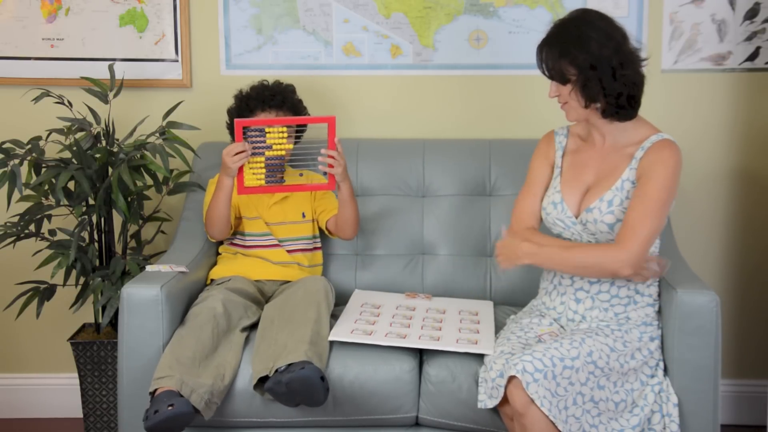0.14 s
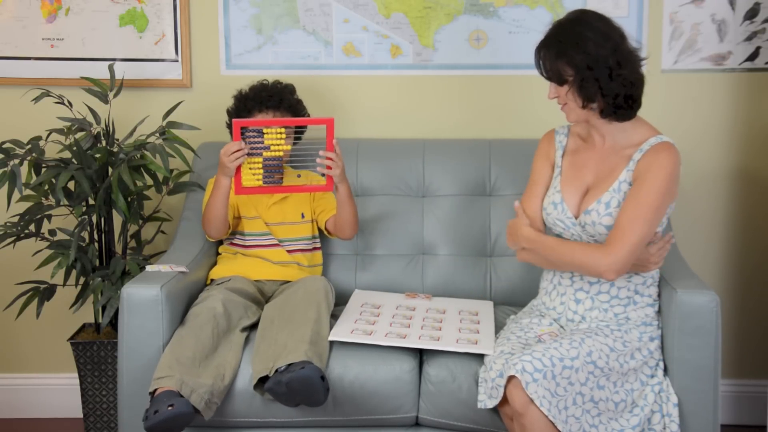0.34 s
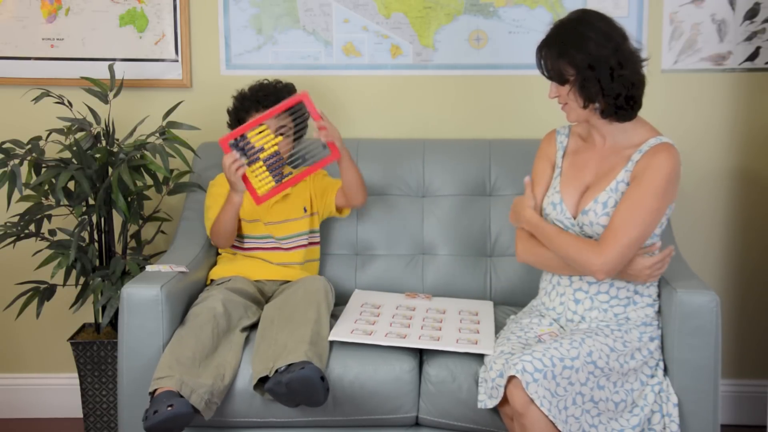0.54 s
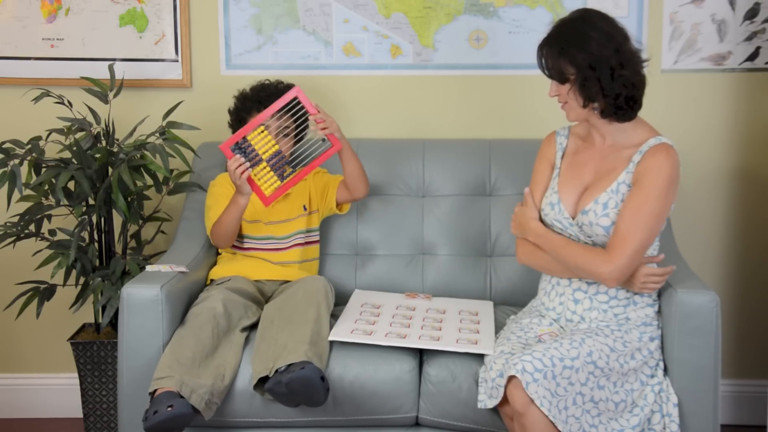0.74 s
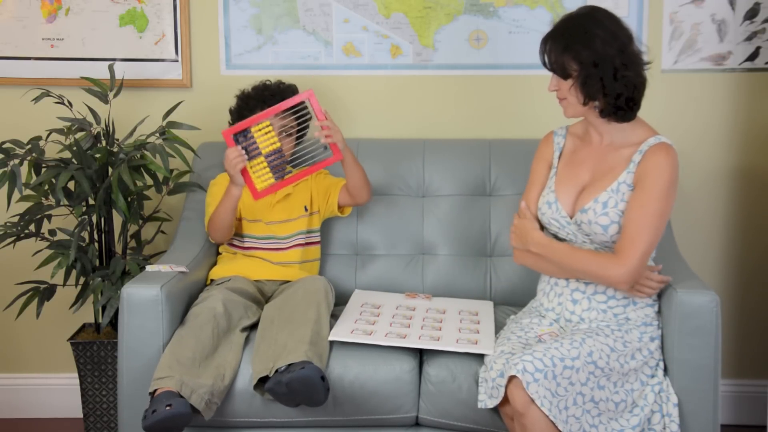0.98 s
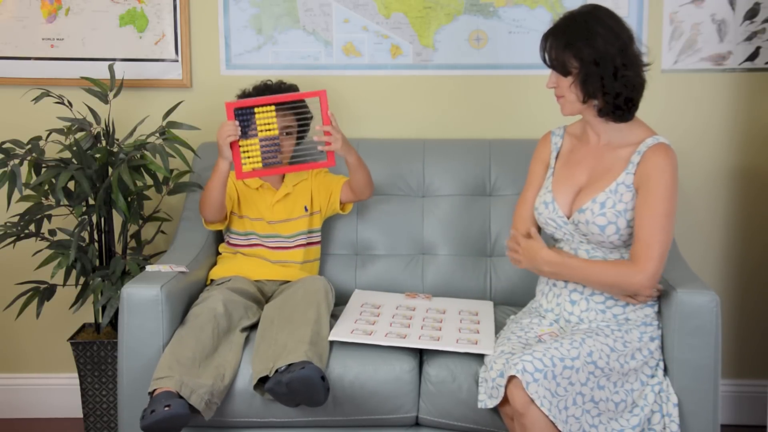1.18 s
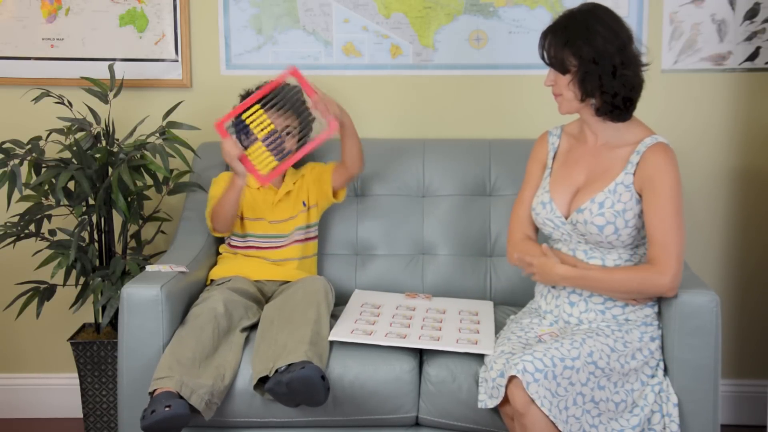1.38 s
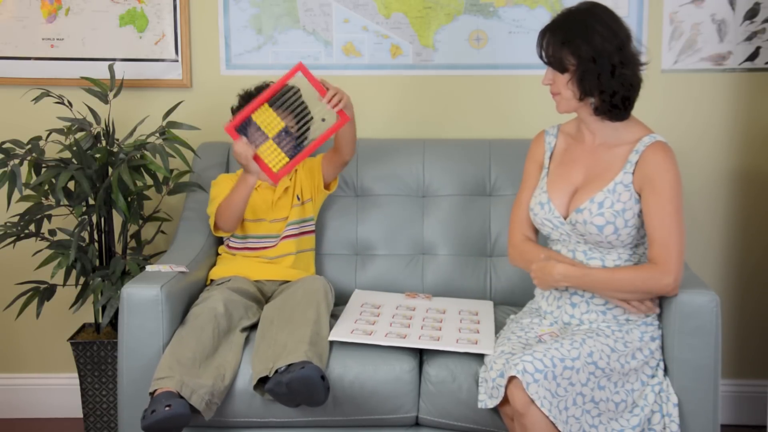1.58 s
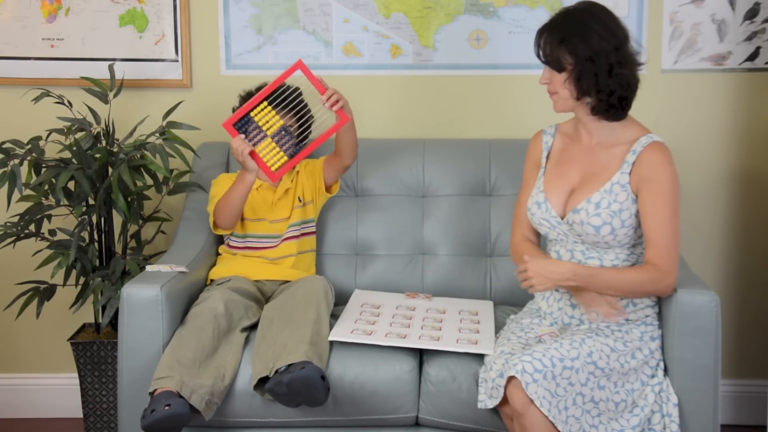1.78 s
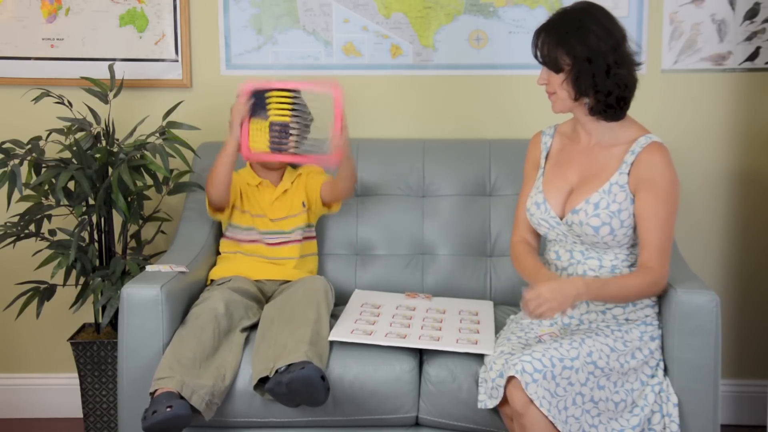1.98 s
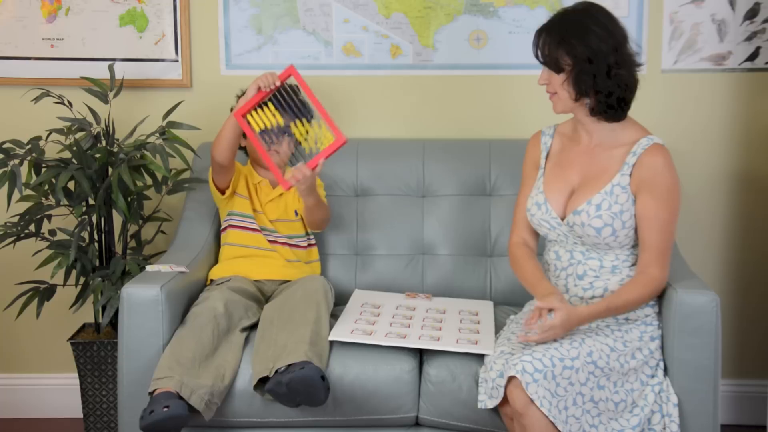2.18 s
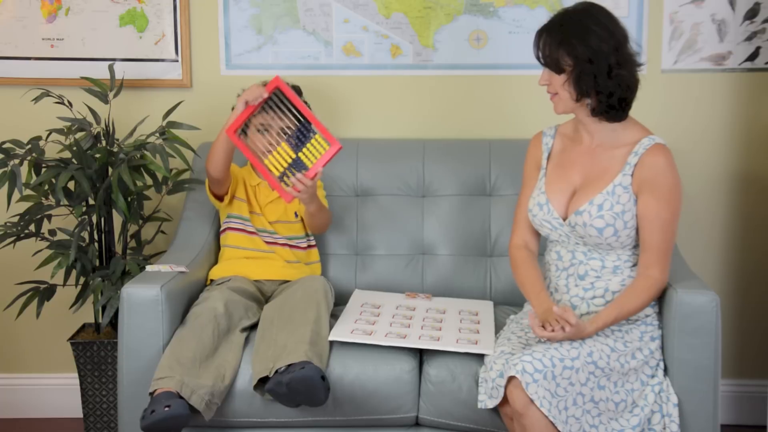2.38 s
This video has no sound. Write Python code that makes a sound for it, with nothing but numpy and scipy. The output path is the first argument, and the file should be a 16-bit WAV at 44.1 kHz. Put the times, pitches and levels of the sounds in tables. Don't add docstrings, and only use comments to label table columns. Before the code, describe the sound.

A small plastic abacus is tilted by hand: short bright bead rattles, sparse faint clicks, then all the beads pile over loudly. Short room tail, low hum and hiss, stereo microphone a couple of metres off.

```python
import sys
import numpy as np
from scipy import signal
from scipy.fft import rfft, irfft
from scipy.io import wavfile
from scipy.ndimage import uniform_filter1d

SR = 44100
rng = np.random.default_rng(int(sys.argv[2]) if len(sys.argv) > 2 else 0)


def invert_db(level):
    return 10 ** (np.asarray(level, dtype=float) / 20)


def put_to_file(sound):
    columns = np.atleast_2d(sound).T
    safe = np.clip(columns, -1, 1)
    whole_steps = np.round(safe * 32767)
    wavfile.write(sys.argv[1], SR, whole_steps.astype(np.int16))


N = 107295

# freq_hz, density_db_per_hz
AIR_MID = [(25, -23), (45, 0), (90, -2), (300, -1.5), (900, -5), (2500, -8), (8000, -10.5), (15800, -13.5)]
# freq_hz, density_db_per_hz
AIR_DIFFERENCE = [(15, -40), (25, -15), (179, -4), (211, -6), (352, -7), (557, -7.5), (881, -9.5),
                  (4950, -13.5), (15800, -17)]
# freq_hz, level_db_rms
STEADY_TONES = [(59.9, -58.5), (119.8, -65), (179.7, -74), (239.7, -70), (300, -68.5), (900, -66),
                (2573, -63), (15690, -70)]
# start_s, peak_db, pitch_hz, t60_s
GRIP_KNOCKS = [
    (0.584, -48, 606, 0.062),
    (.645, -40.5, 512, 0.063),
    (0.645, -53, 930, 0.027),
]
# start_s, length_s, level_db, rise_share_0_1, frame_re_bead_db
PILE_UPS = [(.398, 0.014, -45, 0.1, -14), (0.551, 0.039, -38, .9, 3), (.572, 0.044, -31, 0.53, -1.5),
            (0.619, .035, -36, 0, 1), (0.686, 0.019, -26, 0, -7), (0.709, 0.047, -40.5, 0, -5.5),
            (0.788, 0.037, -42.5, 0.7, -11), (1.03, 0.036, -51, 0.5, 6), (1.22, 0.026, -51.5, .2, -13),
            (1.285, 0.048, -50, 0.15, 2), (1.396, 0.033, -39.5, 0.43, 8.5), (1.428, 0.051, -37, 0.47, 4.5),
            (1.567, .02, -40.5, 0.53, 7), (1.651, 0.031, -43, 0.16, 3.5), (1.8289, .011, -34, 0.57, -17),
            (1.84, 0.028, -41.5, 0, -9), (1.959, .03, -43, 0.07, 7), (2.019, 0.038, -36.5, 0.97, 6),
            (2.043, 0.069, -35, .1, 2.5), (2.1826, 0.036, -18.5, 0, -4), (2.223, 0.054, -20, .2, -7.5),
            (2.27, 0.036, -18.5, 0.02, -3.5), (2.321, 0.041, -18, 0, -5), (2.377, 0.021, -20.5, 0, -6)]
# freq_hz, level_db
BEAD_COLOUR = [(1300, -25), (2000, -17), (2700, -3), (4100, -5), (5500, -2.5), (8000, -2), (10500, -6.5),
               (12500, -14.5)]
# pitch_hz, level_db, t60_s
ROD_MODES = [(2620, -6, .025), (3080, -4, .025), (3540, -1, .03), (3750, 0, .025), (4060, 1, .02),
             (4390, 0, .03), (4750, -3, .025)]
# pitch_hz, level_db, t60_s
FRAME_MODES = [(593, -11, 0.021), (860, -12, 0.011), (945, -9, 0.029), (1170, -4.5, 0.0083),
               (1470, -11.5, .02), (1570, -9.5, 0.025), (2040, -8.5, 0.016), (2250, -7, 0.031)]
# low_hz, high_hz, loudness_limit_db
LOST_BANDS = [(12600, 13400, -24), (13400, 14200, -28), (14200, 15000, -31), (15000, 22050, -30)]

AIR_MID_DB, AIR_DIFFERENCE_DB, TONE_WANDER_DB = -50.5, -54.5, 0.5
ROOM_DB, ROOM_T60_S, TREBLE_T60_S, TREBLE_HZ = -1, 0.71, 0.67, 6100
EARLY_DB, EARLY_T60_S, FIRST_ECHO_S, ROOM_ALIKE_SHARE = 2, 0.08, 0.003, 0.69
PAN_DB, RIGHT_LAG_S = 1, 3.5e-5
CLACKS_PER_S, CLACK_SPREAD_DB, RELEASE_S = 4000, 1.5, 0.0023
BEAD_T60_CYCLES, RODS_DB, FRAME_DB = 11.0, -3, -10.5
DULLING_DB_PER_OCTAVE_PER_DB, USUAL_FRAME_DB = 0.24, -4
SWING_UP_CYCLES = 56
BLOCK_SAMPLES, LIMIT_SPREAD_DB, SETTLE_BLOCKS, SETTLED_DB = 1024, 6, 7, 12


def at_hz(points, hz):
    point_hz, point_db = np.array(points).T
    return np.interp(np.log(hz), np.log(point_hz), point_db)


def rms_one(x):
    return x / np.sqrt(np.mean(x ** 2) + 1e-20)


def ring(clicks, hz, t60_s):
    radius = invert_db(-60 / (t60_s * SR))
    angle = 2 * np.pi * hz / SR
    return signal.lfilter([0, np.sin(angle)], [1, -2 * radius * np.cos(angle), radius ** 2], clicks + 1e-18)


def filtered(x, order, cutoff_hz, kind="low"):
    return signal.sosfilt(signal.butter(order, cutoff_hz, kind, fs=SR, output="sos"), x)


def coloured(spectrum):
    hz = np.maximum(np.arange(N // 2 + 1) * SR / N, 1)
    return rms_one(irfft(rfft(rng.standard_normal(N)) * invert_db(at_hz(spectrum, hz)), N))


def air():
    mid = invert_db(AIR_MID_DB) * coloured(AIR_MID)
    difference = invert_db(AIR_DIFFERENCE_DB) * coloured(AIR_DIFFERENCE)
    return mid + difference * [[1], [-1]]


def tones():
    t, out = np.arange(N) / SR, np.zeros(N)
    for hz, level_db in STEADY_TONES:
        wander = np.interp(t, np.linspace(0, N / SR, 40), rng.standard_normal(40))
        level = np.sqrt(2) * invert_db(level_db + TONE_WANDER_DB * wander)
        out += level * np.sin(2 * np.pi * (hz * t + rng.random()))
    return out


def room(x):
    t = np.arange(SR // 2) / SR
    mid, side = rng.standard_normal((2, len(t)))
    side = filtered(side, 1, 2500, "high")
    echoes = np.sqrt(ROOM_ALIKE_SHARE) * mid + np.sqrt(1 - ROOM_ALIKE_SHARE) * side * [[1], [-1]]
    low = filtered(echoes, 2, TREBLE_HZ)
    tail = low * invert_db(-60 * t / ROOM_T60_S) + (echoes - low) * invert_db(-60 * t / TREBLE_T60_S)
    tail *= np.clip(t / FIRST_ECHO_S - 1, 0, 1)
    tail *= 1 + invert_db(EARLY_DB - 60 * t / EARLY_T60_S)
    tail /= np.sqrt(np.sum(tail ** 2) / 2)
    return signal.fftconvolve(x[None], tail, axes=1)[:, :N]


def knocks():
    out = np.zeros(N)
    for start_s, peak_db, hz, t60_s in GRIP_KNOCKS:
        click = np.zeros(N)
        click[int(start_s * SR)] = invert_db(peak_db)
        out += ring(click, hz, t60_s)
    return out


def effort():
    t = np.arange(N) / SR
    bead_power, frame_power = np.zeros(N), np.zeros(N)
    for start_s, length_s, level_db, rise_share, frame_db in PILE_UPS:
        rise = np.clip((t - start_s) / (np.clip(rise_share, 0.02, 1) * length_s), 0, 1)
        shape = rise * np.exp(-np.maximum(t - start_s - length_s, 0) / RELEASE_S)
        bead_power += (invert_db(level_db) * shape) ** 2
        frame_power += (invert_db(level_db + frame_db) * shape) ** 2
    return np.sqrt(bead_power), np.sqrt(frame_power)


def uneven_clacks():
    size_db = CLACK_SPREAD_DB * np.minimum(rng.exponential(1, N), 3)
    sizes = invert_db(size_db) * rng.choice([-1, 1], N)
    return rms_one(sizes * (rng.random(N) < CLACKS_PER_S / SR))


def struck(clacks, strength, hz, t60_s):
    hits = clacks * rng.standard_normal(N) * strength
    return ring(hits, hz, t60_s) / np.sqrt(t60_s * SR / (4 * np.log(1000)))


def lagging(push, hz):
    r = np.exp(-hz * (hz / 1000) ** 2 / (SWING_UP_CYCLES * SR))
    return signal.lfilter([1 - r], [1, -r], push)


def abacus():
    clacks = uneven_clacks()
    bead, push = effort()
    frame_re_bead_db = 20 * np.log10((push + 1e-9) / (bead + 1e-9))
    dull_db = DULLING_DB_PER_OCTAVE_PER_DB * (frame_re_bead_db - USUAL_FRAME_DB)
    pitches_hz = np.geomspace(1400, 13000, 24)
    weights = invert_db(at_hz(BEAD_COLOUR, pitches_hz)) * np.sqrt(pitches_hz)
    weights /= np.linalg.norm(weights)
    beads, frame = np.zeros(N), np.zeros(N)
    for hz, weight in zip(pitches_hz, weights):
        dulled = bead * invert_db(-dull_db * np.log2(hz / 4000))
        beads += weight * struck(clacks, dulled, hz, BEAD_T60_CYCLES / hz)
    for hz, level_db, t60_s in ROD_MODES:
        beads += invert_db(RODS_DB + level_db - 11) * struck(clacks, bead, hz, t60_s)
    for hz, level_db, t60_s in FRAME_MODES:
        frame += invert_db(FRAME_DB + level_db - 5) * struck(clacks, lagging(push, hz), hz, t60_s)
    return filtered(beads, 4, [1500, 14500], "band") + filtered(frame, 3, [600, 2600], "band")


def scene():
    background = air() + tones()
    toy = knocks() + abacus()
    hz = np.arange(N // 2 + 1) * SR / N
    late = irfft(rfft(toy) * np.exp(-2j * np.pi * hz * RIGHT_LAG_S), N)
    direct = np.array([toy * invert_db(PAN_DB), late * invert_db(-PAN_DB)])
    return direct + invert_db(ROOM_DB) * room(toy) + background


def starve(x):
    blocks = np.arange(N) // BLOCK_SAMPLES
    hz = np.arange(N // 2 + 1) * SR / N
    loud_db = 10 * np.log10(np.bincount(blocks, np.mean(x ** 2, 0)) / BLOCK_SAMPLES + 1e-12)
    settled = loud_db - np.roll(loud_db, SETTLE_BLOCKS) < 5
    relief_db = SETTLED_DB * settled * (loud_db > -25)
    spectrum, out = rfft(x), x.copy()
    for low_hz, high_hz, limit_db in LOST_BANDS:
        spread_db = LIMIT_SPREAD_DB * rng.standard_normal(len(loud_db))
        dropped = loud_db > limit_db + relief_db + spread_db
        gate = uniform_filter1d(uniform_filter1d(dropped[blocks] * 1.0, size=256), size=256)
        out -= gate * irfft(spectrum * ((hz >= low_hz) & (hz < high_hz)), N)
    return out


def roll_off(x):
    return signal.sosfilt(signal.butter(12, 15950, fs=SR, output="sos"), x)


def record(dry):
    mix = starve(dry)
    return roll_off(mix)


dry = scene()
out = record(dry)
put_to_file(out)
```